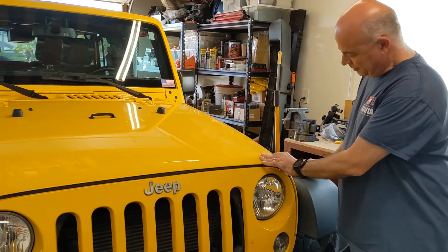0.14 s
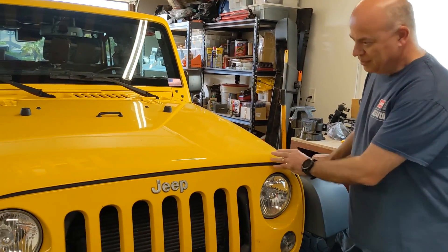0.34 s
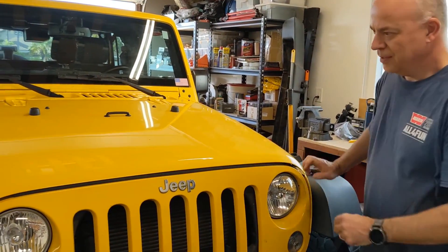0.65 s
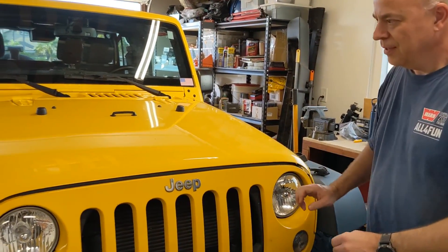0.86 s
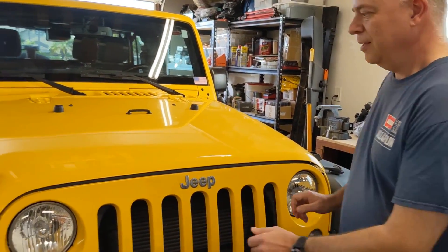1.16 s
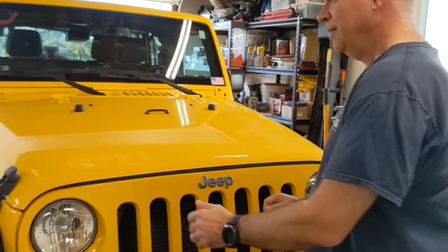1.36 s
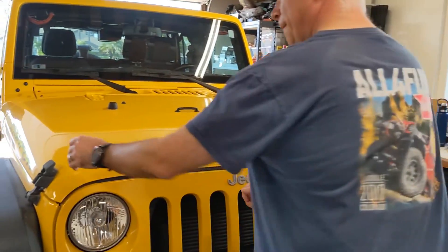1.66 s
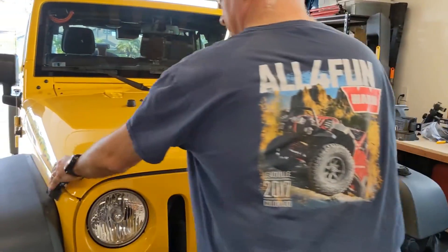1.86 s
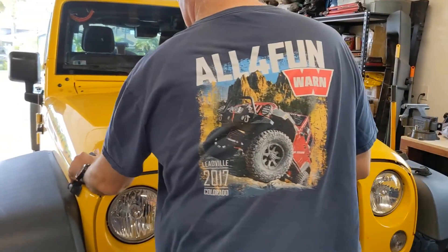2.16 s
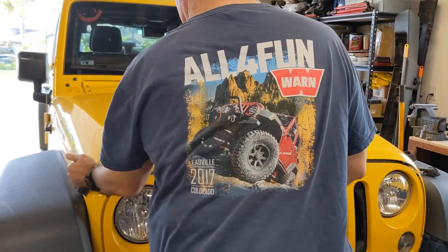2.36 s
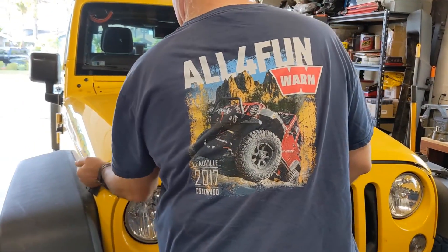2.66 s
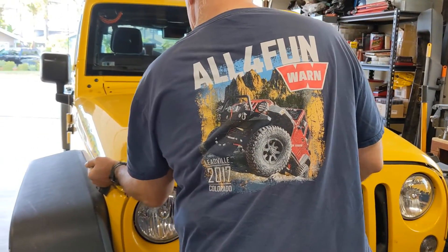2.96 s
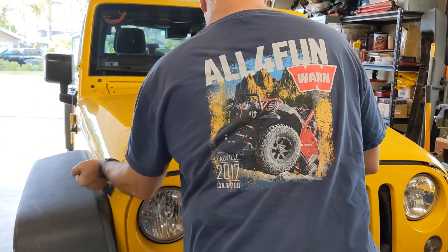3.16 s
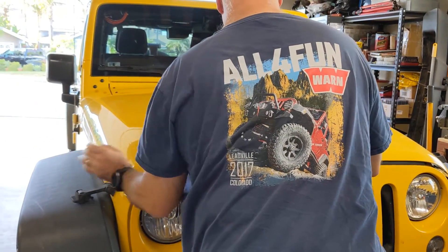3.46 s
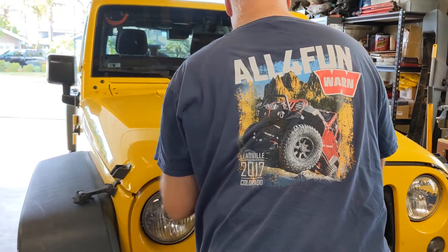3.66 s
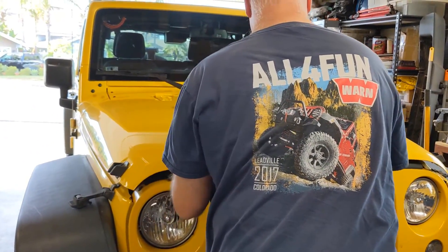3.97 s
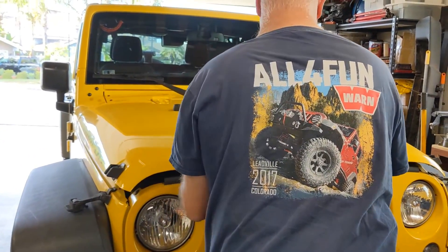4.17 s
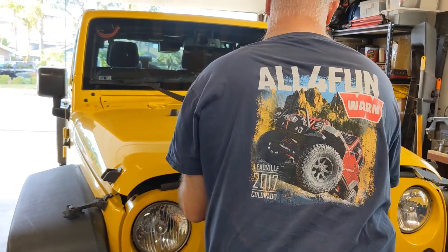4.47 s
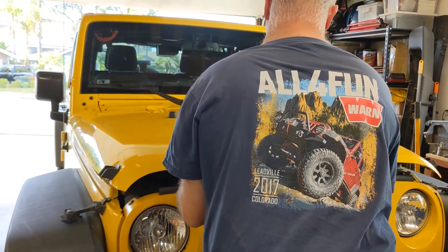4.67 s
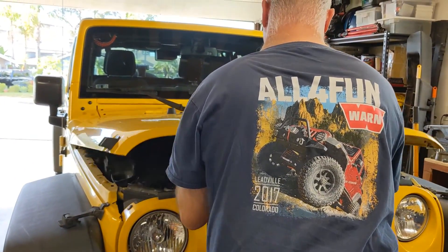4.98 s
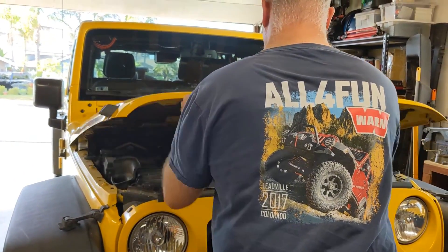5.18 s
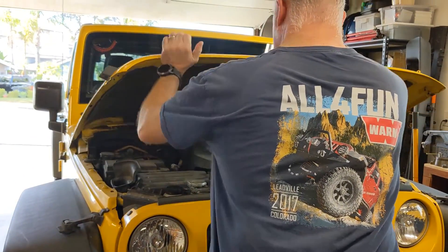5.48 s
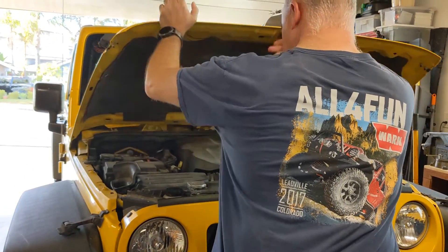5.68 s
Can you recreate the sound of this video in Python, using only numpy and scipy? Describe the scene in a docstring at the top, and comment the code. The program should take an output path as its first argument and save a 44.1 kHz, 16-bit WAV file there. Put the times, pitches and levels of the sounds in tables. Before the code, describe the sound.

In a garage with low rumble, a dull knock and two small slip-and-snap pairs open the near hood latch. Shoes and cloth scuff as a man steps across. Dull knocks work the second latch loose, then the hood pops up with a loud clank and two weaker bounces. A catch clicks and slides, and hinges tick during lifting. Close stereo: right side open, left muffled with occasional bumps.

```python
"""A dull knock comes first, over workshop rumble: a man unhooks the two latches of a car's steel hood.
The hood springs up, bounces twice and is lifted off its safety catch; shoes and shirt scuff as he steps across.
The right microphone is open; the left one is muffled and gets bumped now and then.
Blows are shaped noise with the resonances of each part, and decaying sines add the steel's clear tones.
Scuffs and footfalls are swelling noise; each bump is a falling click and a slow thump."""
import sys
import numpy as np
from scipy import signal
from scipy.fft import rfft, irfft, next_fast_len
from scipy.io import wavfile
from scipy.ndimage import uniform_filter1d

SR = 44100
rng = np.random.default_rng(int(sys.argv[2]) if len(sys.argv) > 2 else 0)


def generate_wav(sig):
    """Save sig (samples, or channels by samples) to the path in sys.argv[1] as 16-bit PCM at SR."""
    pcm = np.round(np.clip(np.atleast_2d(sig).T, -1, 1) * 32767).astype(np.int16)
    wavfile.write(sys.argv[1], SR, pcm)


N = 257041  # length [samples]
SIZE = 32768  # length of one blow and of the filters [samples]
HZ = np.fft.rfftfreq(SIZE, 1 / SR)
TIME = np.arange(N) / SR


def amp(db):
    """Decibels to gain."""
    return 10 ** (np.asarray(db) / 20)


def unit(x):
    """x at rms 1."""
    return x / np.sqrt(np.mean(x ** 2) + 1e-20)


def along(points, hz):
    """(frequency [Hz], value) points read on a log frequency axis."""
    f, v = np.transpose(points)
    return np.interp(np.log(hz + 1), np.log(f), v)


def filtered(x, response):
    """x times a response of frequency."""
    m = next_fast_len(N + SIZE)
    spectrum = rfft(x, m) * response(np.fft.rfftfreq(m, 1 / SR))
    return irfft(spectrum, m)[..., :N]


def noise(spectrum):
    """Noise of rms 1 whose spectrum follows (frequency [Hz], relative level [dB])."""
    white = rng.standard_normal(N)
    return unit(filtered(white, lambda hz: amp(along(spectrum, hz))))


def causal(gain):
    """The minimum-phase response with this gain on HZ."""
    cepstrum = irfft(np.log(np.maximum(gain, 1e-6)))
    cepstrum[1:SIZE // 2] *= 2
    cepstrum[SIZE // 2 + 1:] = 0
    return np.exp(rfft(cepstrum))


def add(track, s, sound):
    """Mix a sound into the track from time s; what falls outside the track is cut."""
    start = round(s * SR)
    heard = sound[max(-start, 0):N - start]
    track[max(start, 0):][:len(heard)] += heard


# Workshop background, spectrum shape: (frequency [Hz], relative level [dB per Hz])
AIR_SPECTRUM = [(20, -0.5), (35, -1.5), (65, 0.5), (110, -2.5), (200, -16), (400, -22), (900, -23),
                (1800, -32.5), (4000, -43), (5500, -48), (7000, -48.5), (9000, -51), (15000, -48)]


def workshop(air_db=-37, whine_hz=13480, whine_db=-78):
    """Low rumble and air, as shaped noise, with a thin electrical whine."""
    whine = np.sin(2 * np.pi * whine_hz * TIME)
    return amp(air_db) * noise(AIR_SPECTRUM) + amp(whine_db) * whine


# Bumps on the muffled microphone:
# (time [s], click level [dB], thump delay [s], thump frequency at its middle [Hz], thump level [dB])
MIC_BUMPS = [(0.932, -75, .017, 72, -23.5), (1.7686, -15, 0.017, 85, -8.5),
             (2.6599, -40, 0.0183, 77, -14.5)]


def bumps(drop_hz=2600, end_hz=170, glide_s=0.00157, click_s=0.004, thump_cycles=0.58, stiffen=0.55):
    """A click that drops quickly in pitch, then one slow push on the diaphragm, which springs back faster."""
    track, t = np.zeros(N), TIME[:SR // 20]
    for s, click_db, delay, thump_hz, thump_db in MIC_BUMPS:
        turns = np.cumsum(end_hz + drop_hz * np.exp(-t / glide_s)) / SR
        click_envelope = t / click_s * np.exp(1 - t / click_s)
        click = click_envelope * np.sin(2 * np.pi * turns)
        cycles = (t - delay) * thump_hz
        push = np.cos(2 * np.pi * np.expm1(stiffen * cycles) / stiffen)
        thump = push * np.exp(-(cycles / thump_cycles) ** 2 / 2)
        add(track, s, amp(click_db) * click + amp(thump_db) * thump)
    return track


def stroke(s, swell, t60):
    """An envelope that swells up to time s and dies away in the room."""
    t = TIME - s
    rise = np.exp(-(np.minimum(t, 0) / swell) ** 2 / 2)
    return rise * amp(-60 * np.maximum(t, 0) / t60)


# Soft footfalls and shifts of weight: (time of the peak [s], swell [s], level [dB])
FOOTFALLS = [(2.068, 0.0074, -39), (2.28, 0.035, -38.5), (4.8, 0.021, -45), (5.42, 0.027, -43.5)]


def footfalls():
    """The feet land softly: mostly low noise under a swelling envelope."""
    sole = noise([(40, -8), (110, 3.5), (200, -5.5), (350, -3.5), (520, -6.5), (800, -39), (3000, -40), (8000, -70)])
    return sole * sum(amp(db) * stroke(s, swell, t60=0.27) for s, swell, db in FOOTFALLS)


# Scuffs of shoes and shirt: (time of the peak [s], swell [s], level of the rub [dB])
RUBS = [(.88, 0.027, -53.5), (1.30, 0.032, -52), (1.3085, 0.0039, -41.5), (1.468, 0.0099, -55),
        (1.885, .0011, -43.5), (2.059, 0.035, -43), (2.285, 0.031, -53), (2.528, 0.02, -47.5)]


def scuffs(grain_db=0.5, hiss_db=-5):
    """Soles and cloth rub in tiny slips, with a hiss that follows the rub."""
    slips = unit(amp(grain_db * unit(uniform_filter1d(rng.standard_normal(N), size=60))))
    rub = noise([(200, -8), (700, -6), (1600, 1.5), (2500, 0.0), (3600, 2), (5200, -4.0), (9000, -22)])
    hiss = noise([(2000, -34), (5500, -13.0), (7000, 2), (8200, -6.5), (11000, -2.5), (15000, -20.0)])
    rub_envelope = sum(amp(db) * stroke(s, swell, t60=0.35) for s, swell, db in RUBS)
    hiss_envelope = sum(amp(db + hiss_db) * stroke(s, swell, t60=0.31) for s, swell, db in RUBS)
    return slips * (rub_envelope * rub + hiss_envelope * hiss)


# Room decay, before each part's sustain factor: (frequency [Hz], t60 [s])
ROOM_DECAY = [(100, 0.6), (300, 0.33), (1000, 0.34), (3000, 0.28), (7000, 0.28), (14000, 0.23)]


def clatter(rise, crack_db, sustain, swell_cycles=2.86, crack_s=0.0013):
    """A crack, then dense reflections that build up (bass last) and die at the room's rate times the sustain."""
    hz, t, z = signal.stft(rng.standard_normal(SIZE), SR, nperseg=256)
    build_s = rise + swell_cycles / np.maximum(hz, 150)[:, None]
    build = 1 - np.exp(-(t + 128 / SR) / build_s)
    decay = amp(-60 * t / (sustain * along(ROOM_DECAY, hz)[:, None]))
    tail = signal.istft(z * build * decay, SR, nperseg=256)[1][:SIZE]
    crack = rng.standard_normal(SIZE) * np.exp(-TIME[:SIZE] / crack_s)
    crack = signal.lfilter([1, -1], [1, -.7], crack)  # thins the bass
    return tail / np.linalg.norm(tail) + amp(crack_db) * crack / np.linalg.norm(crack)


PIVOT_HZ = 1000  # brightness tilts the sound about this frequency
CRACK_LOSS_DB_PER_S = 1000  # the slower a contact rises, the weaker its crack
# How much of a blow's thud reaches each frequency: (frequency [Hz], share)
THUD_REACH = [(100, 1), (380, 0.018)]


def struck(blows, colour, modes, crack_db, sustain, ring_share=0.085, ripple_db=2.5):
    """Each blow sounds the part's resonances, one more that depends on where it lands, and many small ones.
    Hard contact tilts the sound brighter; weight behind it adds a low thud."""
    track = np.zeros(N)
    octaves = np.log2(np.clip(HZ, colour[0][0], colour[-1][0]) / PIVOT_HZ)
    for s, rise, level_db, thud_db, brightness, ring_hz, ring_db in blows:
        colour_db = along(colour, HZ) + level_db + brightness * octaves + thud_db * along(THUD_REACH, HZ)
        peaks = [*modes, (ring_hz, ring_share * ring_hz, ring_db)]  # its width is a share of its frequency
        for hz, width, lift in peaks:
            colour_db = colour_db + lift * np.exp(-((HZ - hz) / width) ** 2 / 2)
        # The steel's crowded upper modes
        ripple = uniform_filter1d(uniform_filter1d(rng.standard_normal(len(HZ)), size=70), size=50)
        colour_db = colour_db + ripple_db * unit(ripple) * HZ / (HZ + 1000)
        z = rfft(clatter(rise, crack_db - CRACK_LOSS_DB_PER_S * rise, sustain))
        # Flattened first: the part, not the room, sets the broad colour
        spread = np.sqrt(abs(uniform_filter1d(abs(z) ** 2, size=61)))
        add(track, s, irfft(z * causal(amp(colour_db) / spread)))
    return track


def tones(modes, attack):
    """One second of modes (frequency [Hz], level [dB], t60 [s]) ringing together, each from a random phase."""
    t = TIME[:SR]
    ring = sum(amp(db - 60 * t / t60) * np.sin(2 * np.pi * (hz * t + rng.random())) for hz, db, t60 in modes)
    return ring * (1 - np.exp(-t / attack))


def ringing(blows, modes, gain_db, attack, longest_t60=0.36):
    """The harder the blow, the louder the steel's clear tones; no tone rings longer than longest_t60."""
    track = np.zeros(N)
    capped = [(hz, db, min(t60, longest_t60)) for hz, db, t60 in modes]
    for s, rise, level_db, *_ in blows:
        add(track, s, amp(level_db + gain_db) * tones(capped, attack))
    return track


# The far latch is worked loose in dull knocks, and its hook ticks: (time [s], rise [s], level in the part [dB],
# thud [dB], brightness [dB per octave], ring frequency [Hz], ring lift [dB])
FAR_BLOWS = [(2.3367, 0.01, -18, 12, 4, 1010, 1.4), (2.511, 0.01, -9.5, 13, 1.6, 208, 6.6),
             (2.7707, 0.015, 0.5, 0.5, 0.64, 378, 5.6), (3.038, 0.037, -9.5, -15, -4.5, 630, 13),
             (3.188, 0.014, -0.7, -1, -0.8, 1830, 4.8), (3.2671, 0.013, -22.5, 10, 9.5, 4450, 2.6)]
# Broad spectrum under its resonances: (frequency [Hz], level [dB])
FAR_COLOUR = [(100, 36), (380, 5.8), (1100, 21), (3000, 6), (6000, -14), (13000, -28)]
# Its resonances: (frequency [Hz], width [Hz], lift [dB])
FAR_MODES = [(240, 22, 12.8), (318.5, 30.4, 16.3), (367.7, 56.6, 16.6), (435, 18.6, 15.8),
             (532, 68.5, 16.5), (750, 170, 6.5), (950, 37, 6), (4020, 540, 7), (6770, 490, 6.5),
             (10342, 1800, 5.1)]


def far_latch():
    """Struck steel with a short decay and a strong crack wherever contact is quick."""
    return struck(FAR_BLOWS, FAR_COLOUR, FAR_MODES, crack_db=7, sustain=0.76)


# The near latch: a dull knock, then twice a small slip followed by a snap (columns as FAR_BLOWS)
NEAR_BLOWS = [(-.01, 0.0011, -18, 18, -0.9, 770, 5), (.2544, .003, -23.5, 4, 0.5, 2930, 7),
              (.2988, 0.0042, -1, -2.5, -0.4, 1360, 6), (.5627, 0.0029, -18, -6, -3, 1385, 0),
              (.6241, 0.0017, 0.5, 4, 0.46, 1640, 5.5)]
# Broad spectrum under its resonances: (frequency [Hz], level [dB])
NEAR_COLOUR = [(100, 24.5), (200, 16.5), (380, 10), (1100, 29.5), (3000, -11), (6000, -6), (13000, -20.5)]
# Its resonances: (frequency [Hz], width [Hz], lift [dB])
NEAR_MODES = [(259, 11, 7.5), (338, 63, 18.5), (459, 19, 9), (600, 153, 10.5), (893, 15, 3.5),
              (1670, 24, 5), (1957, 133, 12.5), (2654, 383, 17.5), (3510, 615, 18), (4760, 320, 7.5),
              (10209, 2500, 8.5)]
# Its clear steel tones: (frequency [Hz], relative level [dB], t60, cut to at most longest_t60 [s])
NEAR_TONES = [(251, -7, 0.73), (314, -22, 5.0), (447, -2, 0.53), (552, -2, 0.57), (830, 5, 0.22),
              (1030, -7, 0.26), (1060, 6, 0.24), (1400, -13, 0.26), (1770, 1, 0.12), (2625, 4, 0.093)]


def near_latch():
    """Struck steel whose clear tones ring under the clatter."""
    knocks = struck(NEAR_BLOWS, NEAR_COLOUR, NEAR_MODES, crack_db=-1.0, sustain=0.89)
    return knocks + ringing(NEAR_BLOWS, NEAR_TONES, gain_db=-23, attack=0.0098)


# The safety catch clicks and slides off, then the hinges tick as the hood rises (columns as FAR_BLOWS)
CATCH_BLOWS = [(4.6375, 0.0043, 0.4, -17, 0.7, 4470, 6.8), (4.69, 0.18, -4, -2, -1.9, 1750, 10),
               (4.993, 0.0056, -9.5, 17, -0.95, 213, 8.3), (5.1643, 0.003, -22, 29, 2.5, 295, 16),
               (5.5274, 0.0041, -25, 15, 5.5, 286, 11), (5.6357, 0.0023, -25, 15, 7, 5092, 6),
               (5.736, 0.0044, -12.5, 19.5, 2, 2270, 9)]
# Broad spectrum under its resonances: (frequency [Hz], level [dB])
CATCH_BROAD = [(100, 18), (380, 5), (1100, 2.5), (3000, 1), (6000, -13.5), (13000, -29.5)]
# Its resonances: (frequency [Hz], width [Hz], lift [dB])
CATCH_PEAKS = [(324, 86, 6.8), (537, 33, 9.4), (889, 184, 10.4), (1450, 73, 8.7), (4113, 81, 9.5),
               (6900, 250, 8)]


def catch():
    """Clicks, a slow-rising slide and ticks, all struck steel with a long decay."""
    return struck(CATCH_BLOWS, CATCH_BROAD, CATCH_PEAKS, crack_db=2.5, sustain=1.36)


# The freed hood panel rings on: (frequency [Hz], relative level [dB], t60 [s])
PANEL_MODES = [(297, -7, 1.65), (369, 12, 0.7), (449, 10, 0.8), (652, 5, 1.5), (700, -0.5, 0.93),
               (1060, -5, 1.1)]
# The hood flexes as it is lifted: (time [s], level [dB])
HOOD_FLEXES = [(5.01, -38.5), (5.39, -40)]


def panel(ring_db=-43, split=0.03, attack=0.033, hook_hz=3550, hook_db=-30, hook_t60=0.26, flex_hz=290, flex_t60=0.94):
    """The free hood rings softly after each bounce and hums when it flexes; the loose hook pings once."""
    track = np.zeros(N)
    twins = [(hz * (1 + split), db - 3.5, t60) for hz, db, t60 in PANEL_MODES]  # the hood's two halves beat
    for s, *_ in HOOD_BLOWS[1:]:
        add(track, s, amp(ring_db) * (tones(PANEL_MODES, attack) + tones(twins, attack)))
    for s, db in HOOD_FLEXES:
        add(track, s, tones([(flex_hz, db, flex_t60)], attack))
    first_bounce_s = HOOD_BLOWS[1][0]
    add(track, first_bounce_s, tones([(hook_hz, hook_db, hook_t60)], attack=0.0015))
    return track


# The hood springs up and bounces twice, weaker each time (columns as FAR_BLOWS)
HOOD_BLOWS = [(3.5536, 0.0051, -2.2, 4.5, 1, 2140, 2.6), (3.882, 0.013, -11.5, -20.5, -0.075, 195, 7.3),
              (4.0462, 0.011, -21.5, -16, 0.75, 1360, 8.8)]
# Broad spectrum under its resonances: (frequency [Hz], level [dB])
HOOD_BROAD = [(100, 37.5), (200, 36), (380, 39), (1100, 22.5), (3000, 25), (6000, 2.5), (13000, -8.5)]
# Its resonances: (frequency [Hz], width [Hz], lift [dB])
HOOD_PEAKS = [(244, 12, 8.8), (461, 103, 6.6), (543, 5.9, 1.7), (654, 13, 2.9), (936, 160, 14.5),
              (1204, 53, 8.7), (1430, 145, 8.8), (2060, 130, 4.8), (2390, 13, 5.7), (4649, 710, 6.8),
              (6770, 740, 9.8), (7700, 180, 4.1), (8950, 470, 8.4), (11540, 2100, 10.5)]
# Its clear steel tones: (frequency [Hz], relative level [dB], t60, cut to at most longest_t60 [s])
HOOD_CLEAR_TONES = [(149, -3, 0.37), (250.8, -20, 0.81), (630, -20, 0.32), (953, -1.5, 0.4),
                    (1033, 8.5, 0.27), (1090, -20, 0.49), (1510, -9, 0.38), (1474, -2, 0.38),
                    (1605, -17, 0.45), (1667, 0.5, 0.39), (2000, -13, 0.14), (2353, -13, 0.24),
                    (2422, -8, 0.27), (2730, -19, 0.23), (3400, -15, 0.37), (3810, -19, 0.29)]


def hood():
    """The large steel sheet: broad blows, clear tones, and the freed panel ringing on."""
    blows = struck(HOOD_BLOWS, HOOD_BROAD, HOOD_PEAKS, crack_db=5.5, sustain=0.97, ring_share=0.2)
    return blows + ringing(HOOD_BLOWS, HOOD_CLEAR_TONES, gain_db=-19.5, attack=0.011) + panel()


LAG = .00026  # the left microphone hears later than the right [s]
# The left microphone's gain against the right: (frequency [Hz], gain [dB])
LEFT_GAIN = [(50, -7), (300, -5), (500, -1), (700, -5.5), (1000, -13.5), (1400, -17), (2000, -20.5),
             (4500, -26), (7000, -27), (14000, -24)]
# How much of the same sound both microphones share: (frequency [Hz], share)
SHARED = [(300, 0.89), (500, 0.98), (1000, 0.75), (1400, 0.046), (2500, 0.067)]
# The left microphone's own hiss, spectrum shape: (frequency [Hz], relative level [dB per Hz])
HISS_SPECTRUM = [(300, -1), (1500, 1.5), (4500, -1.5), (5500, -9.5), (11000, -11.5), (15000, -17)]


def muffled(sound, scatter_s=0.019, hiss_db=-66):
    """The left microphone hears much the same bass, but a dull treble that arrives by other paths."""
    paths = rfft(rng.standard_normal(SIZE) * np.exp(-TIME[:SIZE] / scatter_s))
    share = np.clip(along(SHARED, HZ), 0, 1)
    mix = share + np.sqrt(1 - share ** 2) * paths / np.sqrt(np.mean(abs(paths) ** 2))
    spread = np.sqrt(abs(uniform_filter1d(abs(mix) ** 2, size=121)))
    delay = np.exp(-2j * np.pi * HZ * LAG)
    response = mix * causal(amp(along(LEFT_GAIN, HZ)) / spread) * delay
    heard = signal.fftconvolve(sound, np.fft.fftshift(irfft(response)))[SIZE // 2:][:N]
    return heard + amp(hiss_db) * noise(HISS_SPECTRUM)


def scene():
    """Workshop, the man's movements, latches, catch and hood at the left and right microphones."""
    movements = footfalls() + scuffs()
    steel = far_latch() + near_latch() + catch() + hood()
    sound = workshop() + movements + steel
    return np.array([muffled(sound) + bumps(), sound])


TOP_HZ = 15850  # band limit


def record(dry):
    """Peaks round off at full scale; nothing is kept above the band limit."""
    rounded = dry / (1 + abs(dry) ** 8) ** (1 / 8)
    return filtered(rounded, lambda hz: hz < TOP_HZ)


dry = scene()
out = record(dry)
generate_wav(out)
```